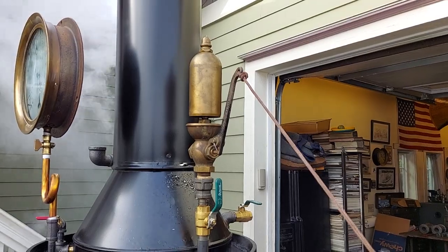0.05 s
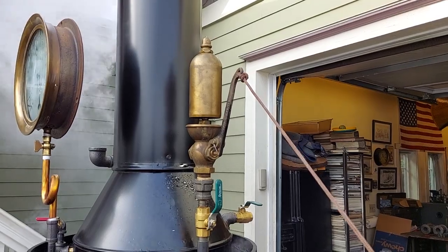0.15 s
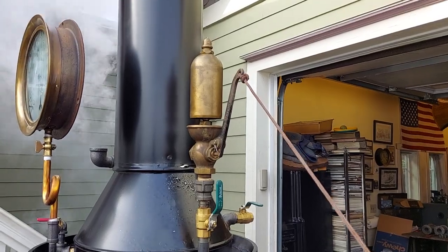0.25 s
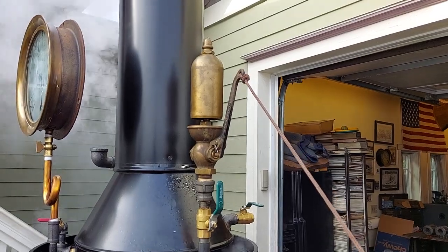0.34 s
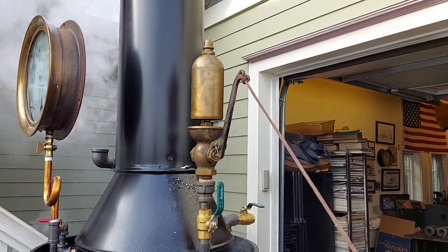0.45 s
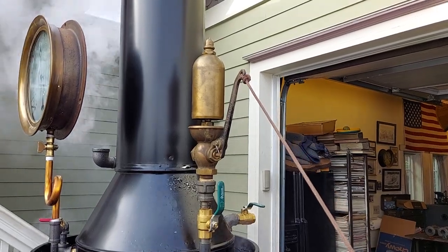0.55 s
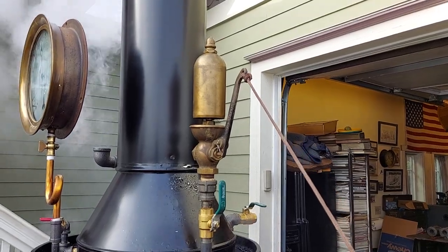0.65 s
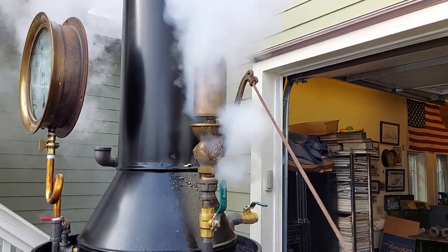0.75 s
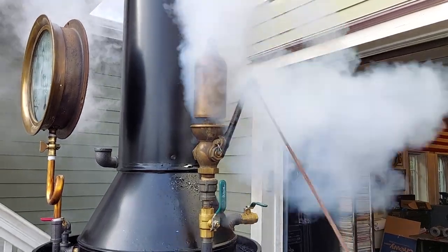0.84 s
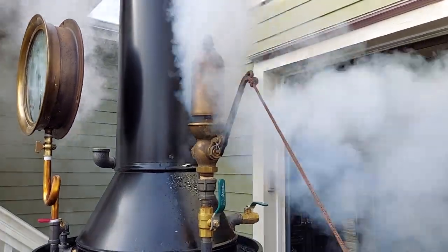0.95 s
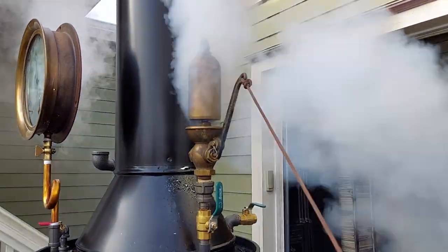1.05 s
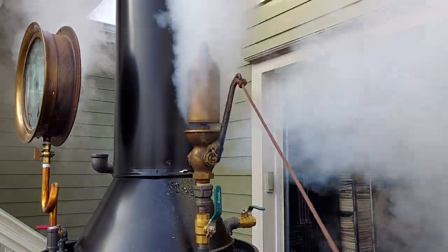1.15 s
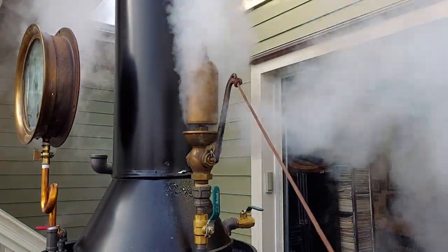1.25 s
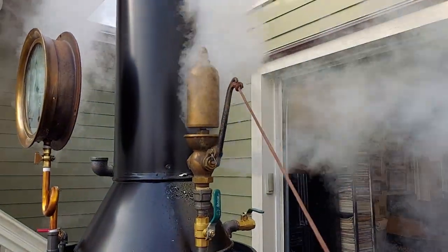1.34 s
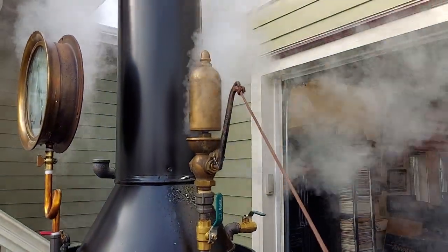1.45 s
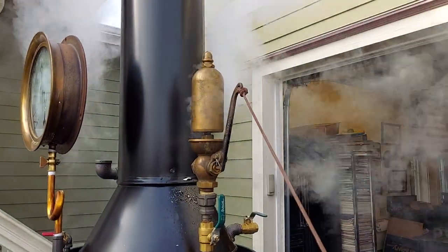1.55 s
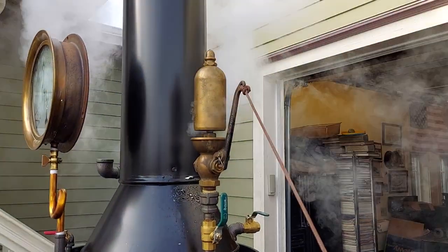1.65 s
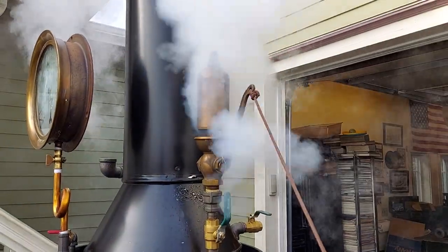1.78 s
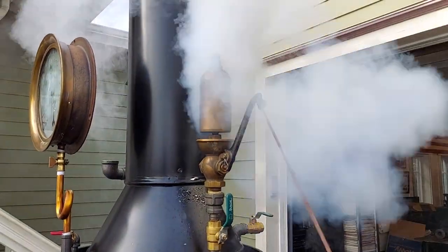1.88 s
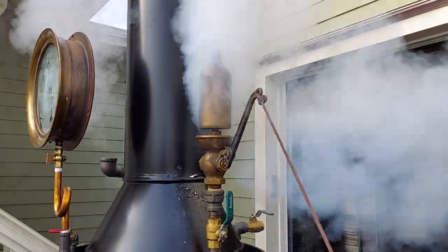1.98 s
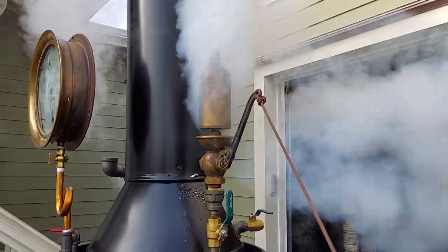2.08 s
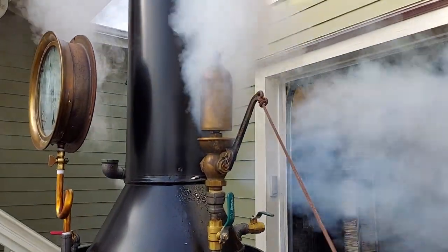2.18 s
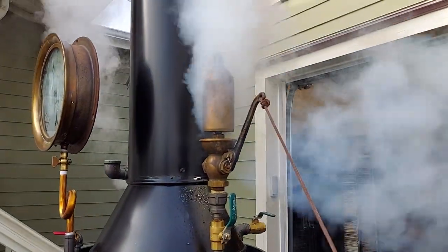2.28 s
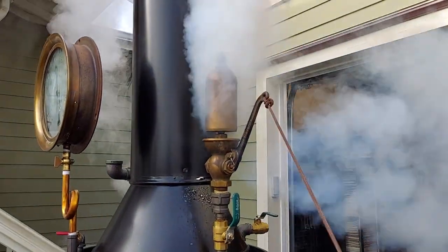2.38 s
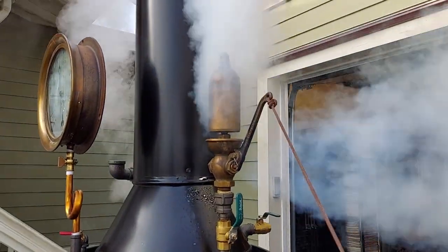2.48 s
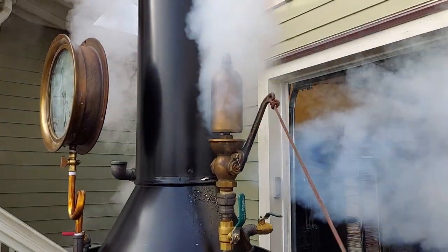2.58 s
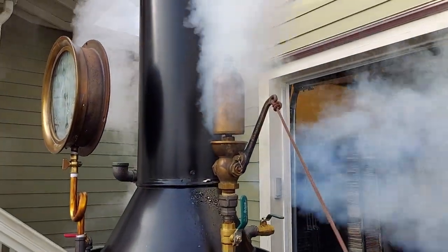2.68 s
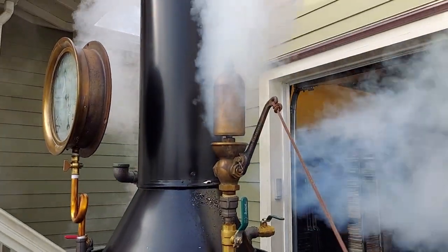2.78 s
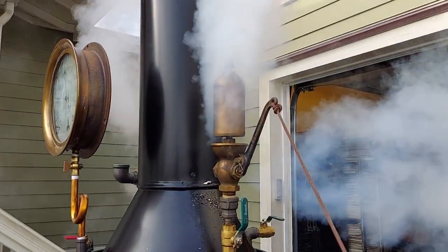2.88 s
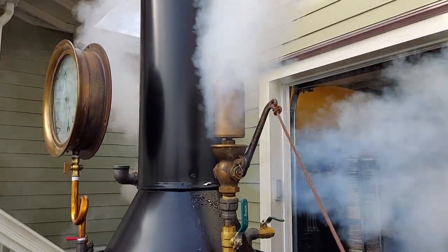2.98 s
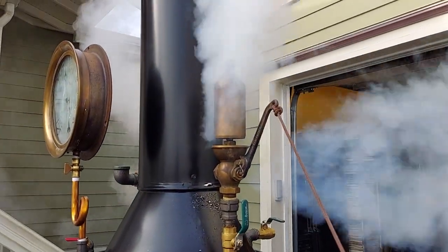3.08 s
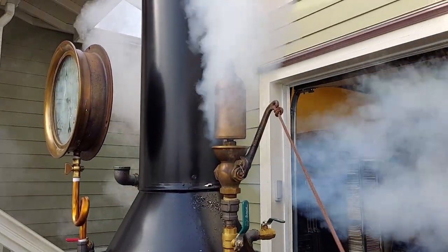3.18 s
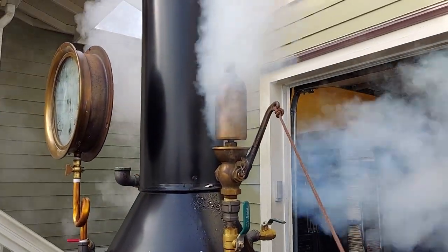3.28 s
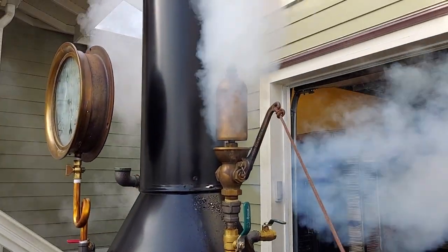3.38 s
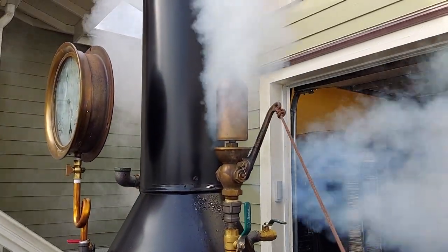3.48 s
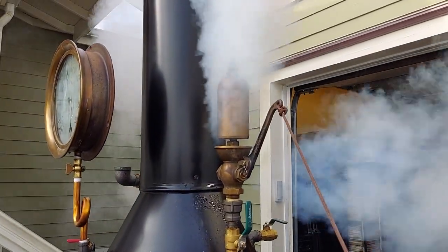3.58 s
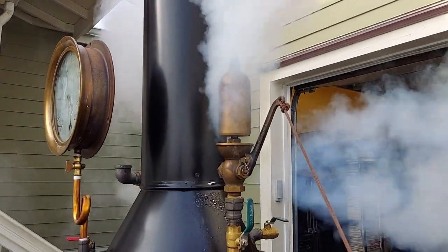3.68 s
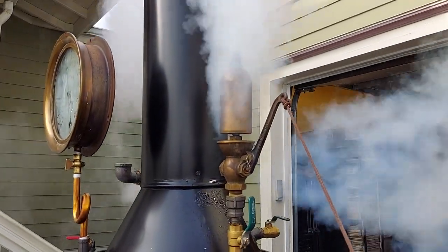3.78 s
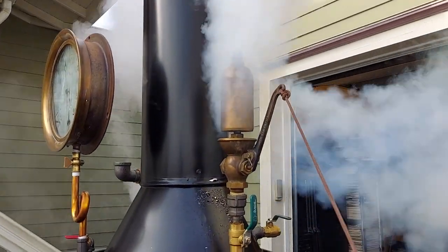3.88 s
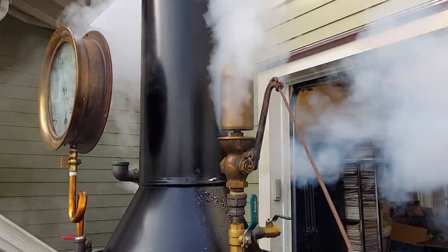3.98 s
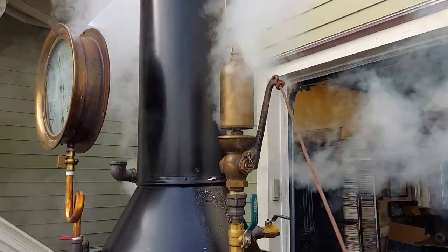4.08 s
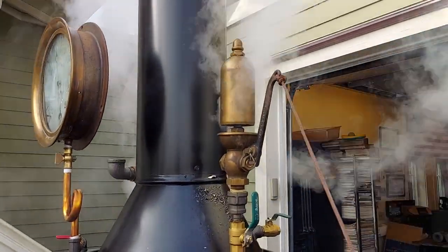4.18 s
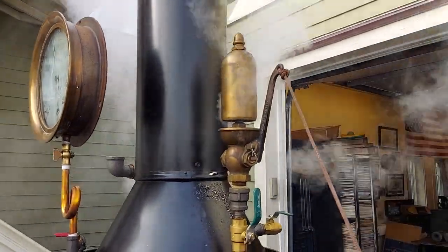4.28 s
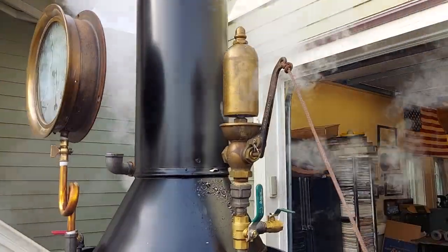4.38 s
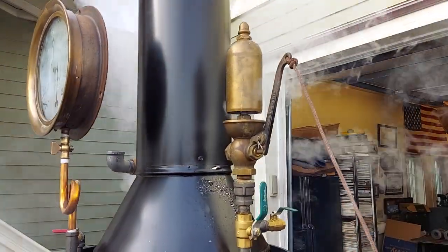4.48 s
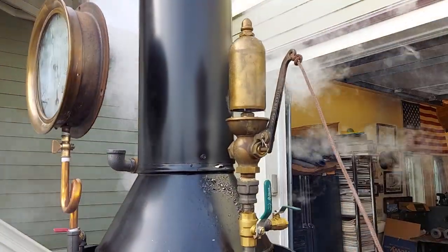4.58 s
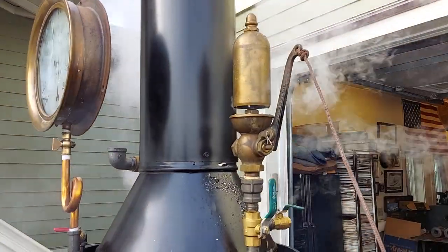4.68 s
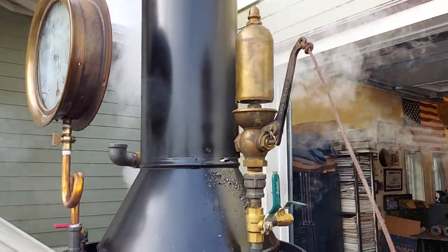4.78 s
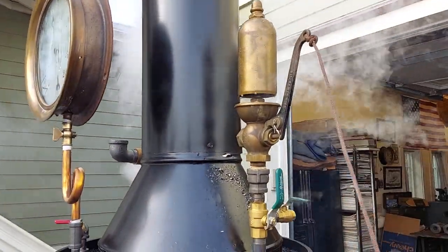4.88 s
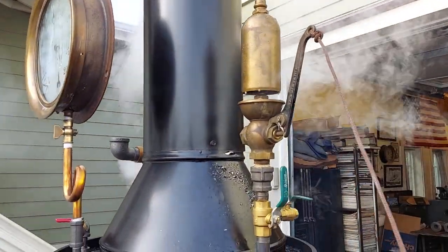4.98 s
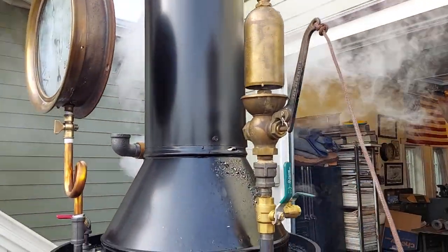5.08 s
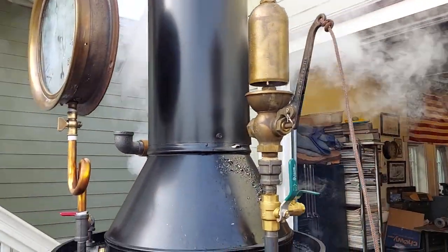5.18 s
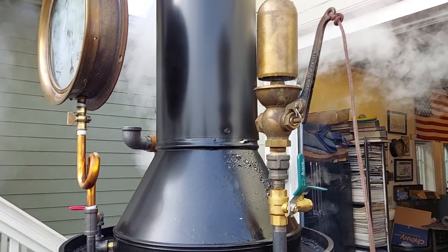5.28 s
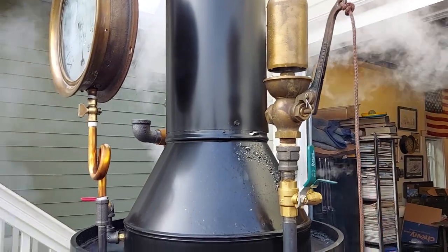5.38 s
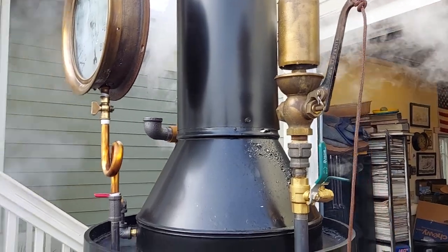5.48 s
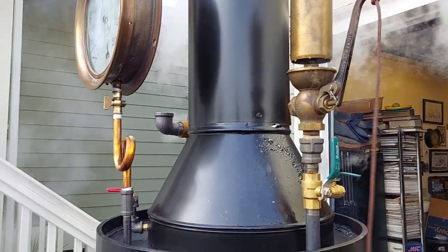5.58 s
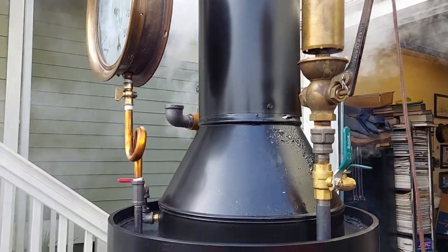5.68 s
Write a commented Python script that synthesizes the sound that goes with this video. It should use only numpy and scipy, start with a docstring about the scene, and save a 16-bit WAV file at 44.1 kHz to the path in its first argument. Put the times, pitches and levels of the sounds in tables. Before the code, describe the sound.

A stereo handheld recorder sits near a leaking boiler in a yard. Bright, boosted steam hiss comes first, then a loud short whistle hoot, a gap of about half a second with much quieter hiss, and a long, rough-edged blast with jet noise and low windy rumble heavier on the left. After the sharp stop, distant walls answer dully, and hiss and thin hum gradually rise again.

```python
"""Steam is heard first, hissing from a small boiler; then its brass whistle blows a short and a long blast.
The whistle is a sum of pipe partials driven by note and steam flow; jet, port and leak are shaped noise.
Near and far walls return the tone as delayed copies, and a pipe hums on three narrow bands of noisy tone.
A faint metal part rattles as decaying modes near the end. The recorder boosts quiet sound,
drops the boost at the first blast, keeps it down through the second, then lets it creep back."""
import sys
import numpy as np
from scipy import signal
from scipy.fft import rfft, irfft
from scipy.io import wavfile
from scipy.ndimage import uniform_filter1d, minimum_filter1d

SR = 44100
rng = np.random.default_rng(int(sys.argv[2]) if len(sys.argv) > 2 else 0)


def gain_from_db(level_db):
    """Convert decibel levels to linear amplitude factors (20 dB per decade)."""
    decades = np.asarray(level_db, float) / 20
    return 10 ** decades


def dump_mix(stems):
    """Bounce the given channels to the path in sys.argv[1] as a 16-bit WAV at rate SR."""
    frames = np.atleast_2d(stems).T  # one column per channel
    limited = np.clip(frames, -1, 1)  # hard clip at full scale
    pcm = np.round(limited * 32767).astype(np.int16)
    wavfile.write(sys.argv[1], SR, pcm)


N = 253134
T = np.arange(N) / SR  # time in s

# Course of each blast, one table a blast: time_s, pitch_hz, note_db, flow_db
BLASTS = [
    [(0.785, 732, -9.5, -44), (0.795, 736, -13, -36), (0.809, 751, -11.5, -30), (0.873, 753.5, -10, -30),
     (1.051, 757, -9.5, -32.5), (1.209, 753.7, -13, -32.5), (1.24, 750.5, -12, -38.5)],
    [(1.81, 753, -7.5, -31), (1.82, 737.6, -11, -36.5), (1.91, 762, -15.5, -32), (2.16, 763, -18, -31.5),
     (2.49, 758, -13.5, -30), (2.57, 755.7, -13.5, -31.5), (2.62, 760.8, -15.5, -30),
     (2.7, 746.4, -11, -34.5), (2.76, 752.6, -16.5, -33.5), (2.93, 748.7, -15, -34.5),
     (3.04, 751, -18, -35), (3.12, 752.3, -13.5, -35), (3.23, 748.5, -16.5, -37), (3.63, 752.7, -14, -35.5),
     (3.73, 760, -14, -34.5), (3.84, 748.5, -14, -35.5), (3.98, 749.4, -16, -35), (4.0, 740, -13, -35)],
]
# Weak upper partials: multiple, level_db (against partial 5), left_right_db, left_lead_rad
UPPER = [(4, -4.5, 22, -2.5), (5, 0, 12, 3.5), (6, -8, 28, 2)]
# Phase between the ports: time_s, then left_lead_rad of partials 1, 2, 3
LEADS = [(1.0, 0.39, 0.55, -0.68), (2.3, .92, 0.13, -1.6), (3.2, 0.58, 1.9, -2.2), (3.8, 0.51, 1.35, -1.77)]
# Level between the ports as the recorder moves: time_s, then left_right_db of partials 1, 2, 3
PANS = [(1.0, -4, -2, 4.6), (2.3, -5.5, 9, 3.8), (3.0, -5.5, 4, 6.2), (3.8, -2.5, 0, 7)]
# Near wall echoes: delay_s, level_db, left_right_db (added to the swapped ports)
ECHOES = [(.048, -16.5, -1.5), (.09, -28.5, 3), (.128, -19, -5.5), (.165, -33, 16.5), (.19, -45, -12),
          (.235, -40.5, -8), (.28, -41, -3)]
# Echoes from across the street: delay_s, level_db
FAR_ECHOES = [(.62, -62), (.76, -48), (.88, -46), (1.06, -54)]
# Spectrum of the steam jet: frequency_hz, relative_db (per Hz)
JET = [(300, -9), (700, -3.5), (2000, 2), (4000, 0.5), (6000, -6), (9000, 3), (12000, -2), (15500, -2)]
# Balance of the steam jet: frequency_hz, left_right_db
JET_PAN = [(300, -10), (3000, 3), (8000, 2.5), (15000, -2)]
# Spits of the opening valve: time_s, level_db, half_length_s (standard deviation)
SPITS = [(0.768, -43.5, 0.0052), (1.808, -39, 0.0063)]
# Spectrum of the eddies in the ports: frequency_hz, relative_db (per Hz)
PORT = [(20, -25), (50, 6), (90, -0.5), (400, -6.5), (1000, -8), (3000, -11), (6000, -12.5), (10000, -30.5)]
# Smooth spectrum of the leak: frequency_hz, relative_db (per Hz)
LEAK = [(30, -15), (64, -12.5), (150, -21), (300, -21), (490, -7), (630, -14.5), (850, -4.5), (1400, -12),
        (2150, 2.5), (2870, -5.5), (3650, -2.5), (4300, -8.5), (7600, -10), (15500, -14.5)]
# Resonances of the leaking fittings: frequency_hz, width_hz, lift_db
LEAK_MODES = [(795, 150, 1.5), (2127, 44, 5.5), (2427, 39, 11.5), (3110, 56, 3), (3475, 37, 13),
              (3720, 125, 9), (4050, 27, 4), (4630, 39, 7.5), (5160, 150, 6.5), (5670, 91, 10.5),
              (7510, 350, 7), (7760, 45, 10.5), (9600, 190, 9)]
# Change of leak colour from the start of blast 1: frequency_hz, change_db
LEAK_GAP = [(60, 4), (500, -1), (1000, 1.5), (2200, -2.5), (3700, -1.5), (8000, 1.5), (15000, 0)]
# Further change from the start of blast 2: frequency_hz, change_db
LEAK_LATER = [(60, 5), (500, -3), (1000, -1.5), (2200, -3), (3700, 1), (8000, 0), (13500, 1.5), (15500, 1)]
# Balance of the leak: frequency_hz, left_right_db
LEAK_PAN = [(60, 11), (99, 17), (160, 2), (270, 4), (450, 2), (740, 0.5), (1220, 7), (2010, 5.5),
            (3330, 5.5), (5500, 5), (9080, -2.5), (15000, -3)]
# Likeness of the leak at the two ports: frequency_hz, likeness (-1 to 1)
LEAK_SAME = [(60, 1), (180, 0.81), (550, 1), (1650, -0.58), (4970, -0.097), (15000, 0.29)]
# Tones of the humming pipe: frequency_hz, level_db, left_right_db, width_hz, fuzz (ratio)
HUM = [(242, -69, 3.5, 25, 0.98), (490, -47.5, 3, 4.5, 0.052), (993, -64.5, 5.5, 42, 0.74)]
# Rattles of the metal part: time_s, level_db
TICK = [(5.5262, -36), (5.5285, -38), (5.5299, -28)]
# Modes of the metal part: frequency_hz, level_db, t60_s
TICK_MODES = [(4600, -8, .012), (5330, 0, .014), (5480, -12, .08)]
# Dips in the response of the ports: frequency_hz, width_hz, left_db, right_db
MIC_DIPS = [(6400, 410, -17.5, 1), (10670, 1710, -13.5, -7)]

# Layers that follow note and flow: usual_db, db_per_note_db, db_per_flow_db, cold_db (change in blast 1)
USUAL_NOTE_DB, USUAL_FLOW_DB = -14, -34
FIRST = USUAL_NOTE_DB, 1, 0, 0
SECOND = -34.5, 0.02, 1.22, -6
THIRD = -22, -0.02, 0.45, -3.5
FIFTH = -34.5, -0.2, -0.68, -12
BREATH = -34.5, -0.7, 2, 3.5
HISS = -26.5, 0.12, 0.86, -1.5
RUMBLE = -22, -0.01, 0.62, -1.9
# Slopes: swell_1_db_s, swell_2_db_s, dying_db_s
FIRST_SLOPES, WEAK_SLOPES = (1700, 2400, 66), (700, 2000, 778)

CLOSING_S = 0.052, 0.075  # each blast: the shutting valve takes 20 dB more in this time
OPENING_S = 0.036  # time constant of the change at the start of a blast


def evened(x):
    """Normalization: divides a signal by its root mean square."""
    return x / np.sqrt(np.mean(np.abs(x) ** 2) + 1e-20)


def read(points, hz):
    """Spectral interpolation: joins the points on a logarithmic frequency axis."""
    f, value = np.transpose(points)
    return np.interp(np.log(hz + 1), np.log(f + 1), value)


def track(rows):
    """Linear interpolation: joins each column of a table in time."""
    s, *columns = np.transpose(rows)
    return [np.interp(T, s, column) for column in columns]


def wobble(width_hz):
    """Narrow-band modulation: complex noise about zero frequency from two equal poles, rms 1."""
    r = np.exp(-np.pi * width_hz / SR)
    z = rng.standard_normal(N) + 1j * rng.standard_normal(N)
    once = signal.lfilter([1], [1, -r], z)
    return evened(signal.lfilter([1], [1, -r], once))


def pair(tone, pan_db, lead_rad):
    """Interaural difference: level and phase part the ports while their mean keeps its level."""
    left = gain_from_db(pan_db) * np.exp(1j * lead_rad) * np.ones(N)
    ports = np.array([left, np.ones(N)])
    mean_size = np.maximum(abs(left + 1), 0.5) / 2  # the floor bounds the gain in opposite phase
    return np.sqrt(2) * (ports / mean_size * tone).real


def hiss(db, pan, same, patchy_db, swell_db):
    """Turbulence noise: random short-time spectra of shape db(hz, s), with drifting patches and a swell."""
    frames, hz = N // 256 + 5, np.fft.rfftfreq(1024, 1 / SR)[:, None]
    a, b, c, d, patches = rng.standard_normal((frames, 513, 5)).T
    patches = uniform_filter1d(patches, size=10, axis=0)
    patches = evened(uniform_filter1d(patches, size=8, axis=1))
    swell = evened(uniform_filter1d(rng.standard_normal(frames), size=6))
    right, like = a + 1j * b, np.clip(same(hz), -1, 1)
    lag = np.exp(-2j * np.pi * hz * 0.000197)  # s: the shared part reaches the left port later
    left = like * right * lag + np.sqrt(1 - like ** 2) * (c + 1j * d)
    side = gain_from_db(read(pan, hz) / 2)
    z = np.array([left * side, right / side])
    s = (np.arange(frames) * 256 / SR)[None]
    z *= gain_from_db(db(hz, s) + patchy_db * patches + swell_db * swell)
    return evened(signal.istft(z, nperseg=1024, noverlap=768)[1][:, :N])


def played(law, slopes, flicker_db=0, opening_db=(0, 0)):
    """Excitation law: note and flow set a layer's gain, which swells before and dies after each blast."""
    usual_db, by_note, by_flow, cold_db = law
    out_db = np.full(N, -200.)
    for rows, swell, cold, first_db, closing in zip(BLASTS, slopes, (1, 0), opening_db, CLOSING_S):
        s, _, note, flow = np.transpose(rows)
        db = usual_db + by_note * (note - USUAL_NOTE_DB) + by_flow * (flow - USUAL_FLOW_DB) + cold * cold_db
        before, after = np.maximum(s[0] - T, 0), np.maximum(T - s[-1], 0)
        first = first_db * np.exp(-np.maximum(T - s[0], 0) / OPENING_S)
        dying = slopes[-1] * after + 20 * (after / closing) ** 2
        out_db = np.maximum(out_db, np.interp(T, s, db) + first - swell * before - dying)
    return gain_from_db(out_db + flicker_db * np.sqrt(2) * wobble(12.8).real)


def whistle():
    """Stopped-pipe resonance: wavering partials, the lowest odd ones strong, with jet noise in the third mode."""
    wavering = 1.563 * wobble(19.1).real  # about 1.1 Hz rms
    turn = 2 * np.pi * np.cumsum(pitch() + wavering) / SR
    pans, leads = track(PANS), track(LEADS)
    # each note starts 5.5 dB further left, then settles within about 0.1 s
    pans[0] = pans[0] + sum(5.5 * np.exp(-((T - rows[0][0]) / 0.1) ** 2) for rows in BLASTS)
    sizes = (played(FIRST, FIRST_SLOPES),
             played(SECOND, WEAK_SLOPES, flicker_db=1.26),
             played(THIRD, (1700, 2400, 600), flicker_db=0.96, opening_db=(-7, -7)))
    out = 0
    for k, (size, rough) in enumerate(zip(sizes, (0.07, 0.2, 0.09))):
        flutter = 1 + rough * wobble(135)  # the jet flaps unevenly across the lip
        out = out + pair(size * flutter * np.exp(1j * (k + 1) * turn), pans[k], leads[k])

    fifth = played(FIFTH, WEAK_SLOPES, flicker_db=0.86, opening_db=(-34, -34))  # comes late
    for k, db, pan_db, lead in UPPER:
        tone = fifth * gain_from_db(db) * (1 + 0.35 * wobble(41)) * np.exp(1j * round(k) * turn)
        out = out + pair(tone, pan_db, lead)

    flat = sum(np.exp(-abs(T - rows[0][0]) / OPENING_S) for rows in BLASTS)
    mode_hz = 2186 - 69.7 * flat  # the breathy mode starts flat
    breath = wobble(55) * np.exp(2j * np.pi * np.cumsum(mode_hz) / SR)
    breath_size = played(BREATH, (900, 2400, 600), flicker_db=0.5, opening_db=(2, 16.5))
    return out + pair(breath_size * breath, 5.3, -2.1)


def pitch():
    """Pressure dependence of pitch: the note scoops up as the valve opens and sags as the pressure goes."""
    gap = (BLASTS[0][-1][0] + BLASTS[1][0][0]) / 2
    out = np.zeros(N)
    # the last pair gives each blast's fall in Hz over its closing time
    for rows, here, closing, sag_hz in zip(BLASTS, (T < gap, T >= gap), CLOSING_S, (84.87, 59)):
        s, hz = np.transpose(rows)[:2]
        before, after = np.clip(s[0] - T, 0, 0.04), np.clip((T - s[-1]) / closing, 0, 1.3)
        scoop_hz = 30040 * before ** 2
        out += here * (np.interp(T, s, hz) - scoop_hz - sag_hz * after)
    return out


def jet():
    """Jet noise: steam hisses while the valve is open, and a high band spits as it opens."""
    noise = hiss(lambda hz, s: read(JET, hz), JET_PAN, lambda hz: 0.45 + 0 * hz, patchy_db=1.2, swell_db=0.3)
    spits = sum(gain_from_db(db) * np.exp(-((T - s) / half) ** 2 / 2) for s, db, half in SPITS)
    spit = pair(spits * wobble(1100) * np.exp(2j * np.pi * 4800 * T), 2.9, -1.4)
    return played(HISS, (330, 750, 650)) * noise + spit


def port():
    """Acoustic streaming: the loud tone pumps air through the ports in lumpy eddies, far more on the left."""
    def shape(hz, s):
        deeper = 7.7 * np.clip(2.8 - s, 0, 1) / (1 + (hz / 130) ** 2)  # dB, gone by 2.8 s
        return read(PORT, hz) + deeper

    pan = [(50, 12), (600, 26.8), (5000, 10.0)]  # frequency_hz, left_right_db
    noise = hiss(shape, pan, lambda hz: 0 * hz, patchy_db=0.98, swell_db=-1.2)
    return played(RUMBLE, (700, 1500, 1000)) * noise


def walls(x):
    """Specular reflection: single echoes from the house and the yard, with the two ports swapped."""
    out = np.zeros_like(x)
    for s, db, pan_db in ECHOES:
        late = round(s * SR)
        out[:, late:] += gain_from_db(db + np.array([[0.5], [-0.5]]) * pan_db) * x[::-1, :-late]
    return signal.lfilter(*signal.butter(2, 3300, fs=SR), out)  # siding and air dull the echoes


def street(x):
    """Propagation delay: late, dull echoes of the note from far walls, 12.5 dB stronger on the left."""
    out = np.zeros(N)
    for s, db in FAR_ECHOES:
        late = round(s * SR)
        out[late:] += gain_from_db(db) * x.mean(0)[:-late]
    dull = signal.sosfilt(signal.butter(4, 1100, fs=SR, output="sos"), out)
    return gain_from_db(np.array([[0.5], [-0.5]]) * 12.5) * dull


def leak():
    """Resonant filtering: fittings colour the escaping steam, and the colour shifts at each blast."""
    def shape(hz, s):
        modes = sum(db / (1 + (2 * (hz - f) / width) ** 2) for f, width, db in LEAK_MODES)
        brighter = 9.0 * np.maximum(s - 5.1, 0) * (hz / 14000) ** 2  # the top brightens near the end
        later = read(LEAK_GAP, hz) * (s > BLASTS[0][0][0]) + read(LEAK_LATER, hz) * (s > BLASTS[1][0][0])
        return read(LEAK, hz) + modes + later + brighter

    noise = hiss(shape, LEAK_PAN, lambda hz: read(LEAK_SAME, hz), patchy_db=0.5, swell_db=-0.5)
    return gain_from_db(-42.5) * noise


def hum():
    """Pipe resonance: three fuzzy tones fade in from 3 s to 4 s, during the long blast, and stay."""
    on = np.clip(T - 3.0, 0, 1)
    out = 0
    for hz, db, pan_db, width, fuzz in HUM:
        tone = (1 + fuzz * wobble(width)) * np.exp(2j * np.pi * hz * T)
        out = out + pair(on * gain_from_db(db) * tone, pan_db, 0.12)
    return out


def tick():
    """Modal decay: a faint metal part rattles in short high rings with a soft start."""
    out = 0
    for s, db in TICK:
        age = np.maximum(T - s, 0)
        ring = 0
        for hz, mode_db, t60 in TICK_MODES:
            ring = ring + gain_from_db(db + mode_db - 60 * age / t60) * np.sin(2 * np.pi * hz * age)
        out = out + (1 - np.exp(-age / 0.0003)) * ring
    return out


def scene():
    """Superposition: the pressures of all sources add at the two ports."""
    tone = whistle()
    return tone + walls(tone) + street(tone) + jet() + port() + leak() + hum() + tick()


def microphones(x):
    """Frequency response: the ports pass 55 to 15780 Hz and have dips of their own."""
    hz = np.fft.rfftfreq(2 * N, 1 / SR)
    dips_db = sum(np.array(db)[:, None] / (1 + (2 * (hz - f) / width) ** 2) for f, width, *db in MIC_DIPS)
    band = (hz < 15780) * hz ** 2 / np.sqrt(hz ** 4 + 55 ** 4)
    return irfft(rfft(x, 2 * N) * gain_from_db(dips_db) * band)[:, :N]


def top_cut(x):
    """Nothing passes above the cut-off."""
    return signal.sosfilt(signal.butter(12, 17070, fs=SR, output="sos"), x)


def record(dry):
    """Automatic gain control: the boost falls fast under loud sound, stays down, then recovers steadily."""
    dry = microphones(dry)
    power = uniform_filter1d((dry ** 2).mean(0), size=200, origin=99)
    power_db = 10 * np.log10(abs(power) + 1e-12)
    wanted_db = np.clip(-15.5 - power_db, 0, 22.5)
    hold = round(1.02 * SR)  # long enough to span the gap between the blasts
    held_db = minimum_filter1d(wanted_db, size=hold, origin=(hold - 1) // 2, mode="nearest")
    rise_db = T * 18.5  # the boost recovers by at most 18.5 dB a second
    boost_db = np.minimum.accumulate(held_db - rise_db) + rise_db
    boost_db = uniform_filter1d(boost_db, size=360, origin=179, mode="nearest")
    return top_cut(dry * gain_from_db(boost_db))


dry = scene()
out = record(dry)
dump_mix(out)
```